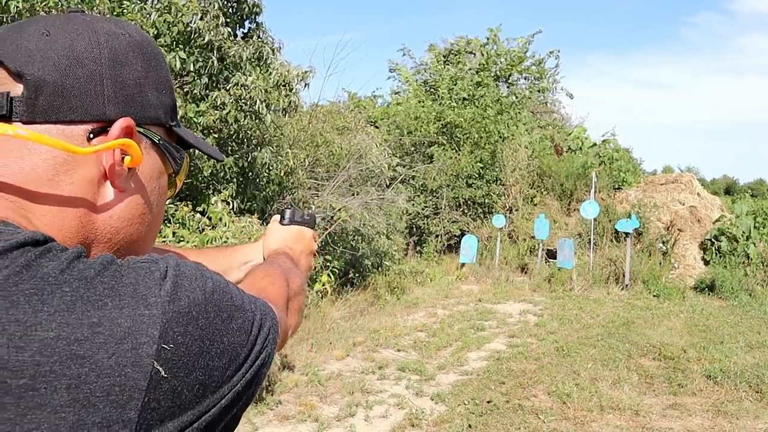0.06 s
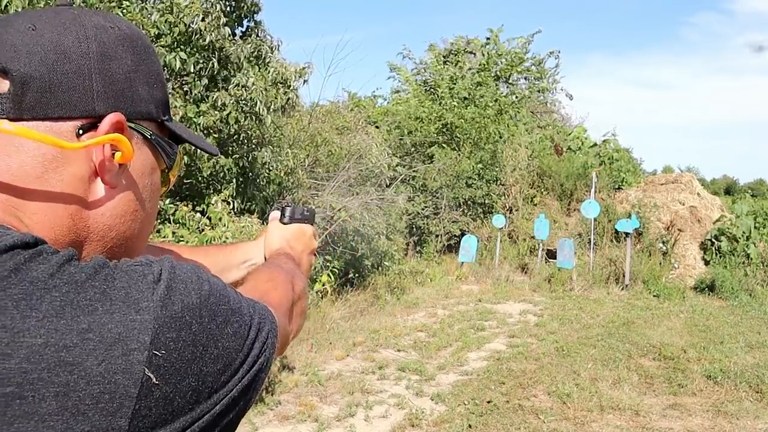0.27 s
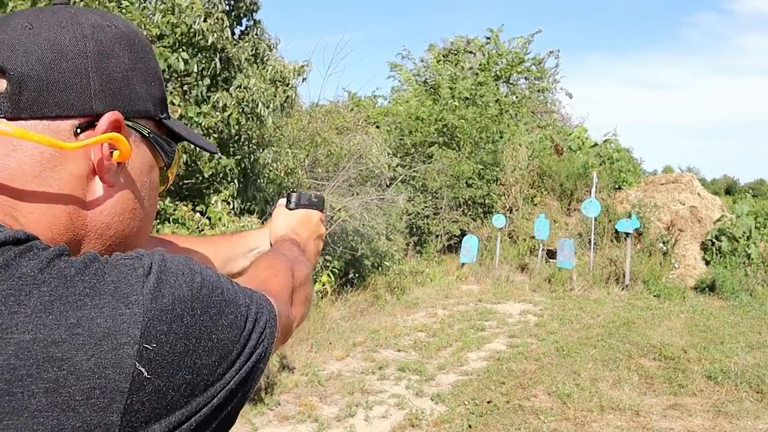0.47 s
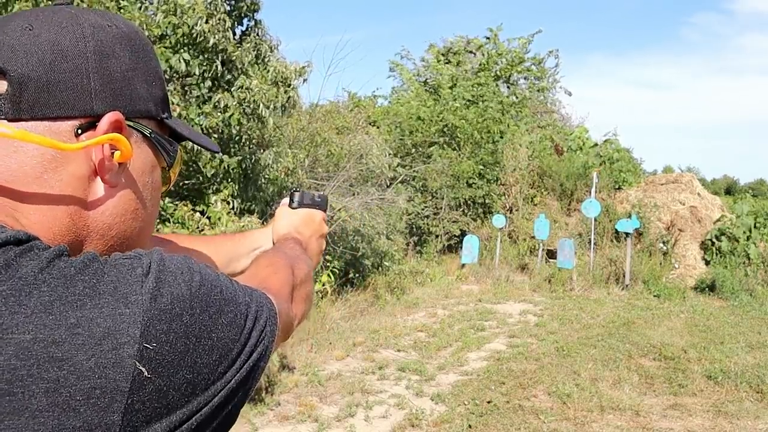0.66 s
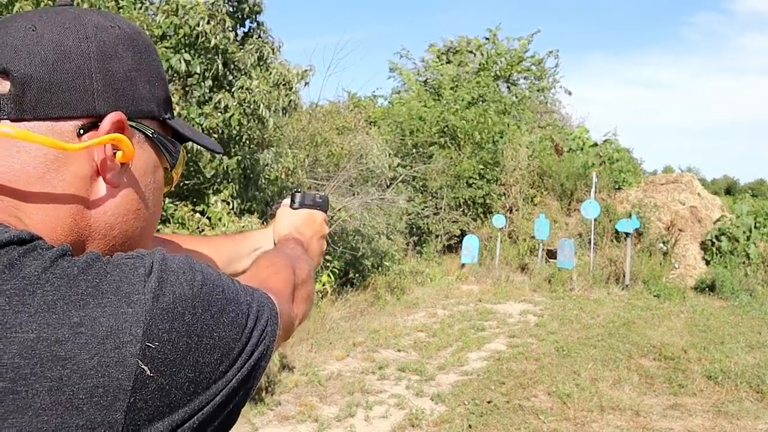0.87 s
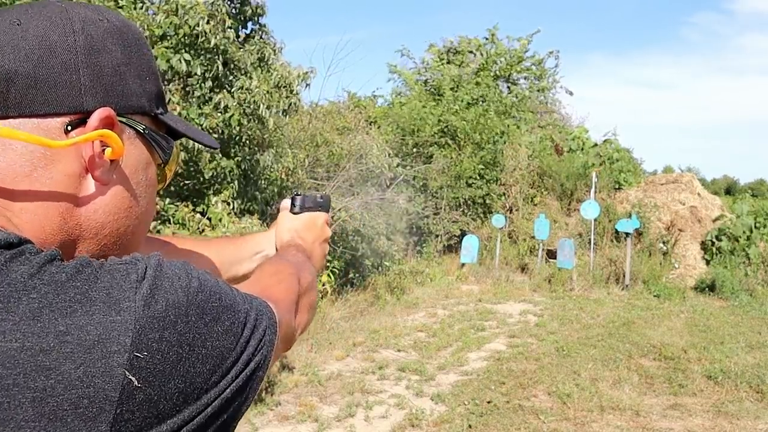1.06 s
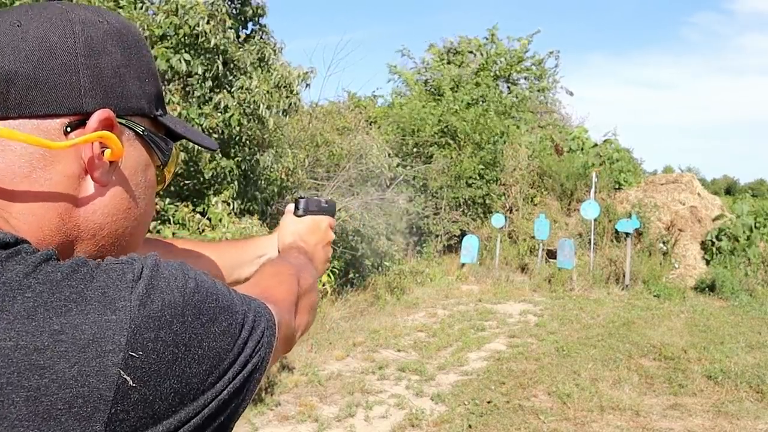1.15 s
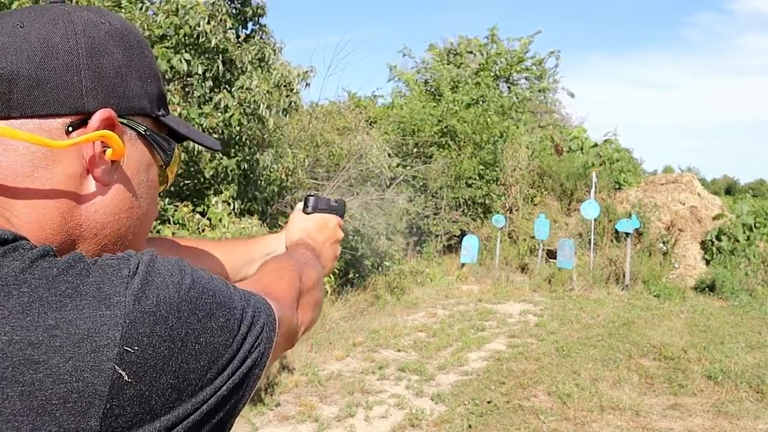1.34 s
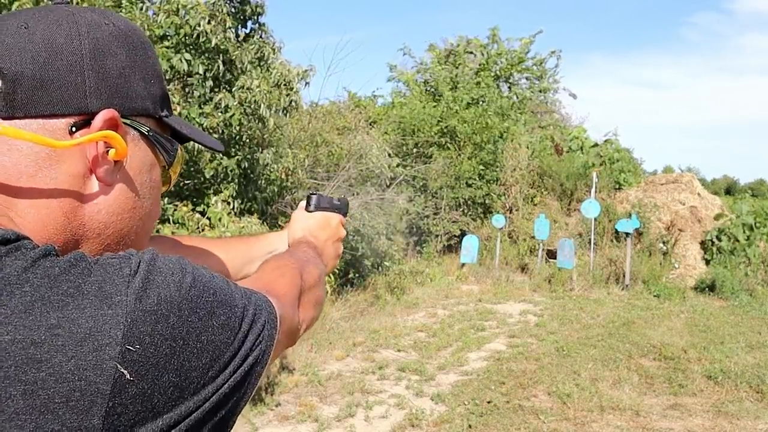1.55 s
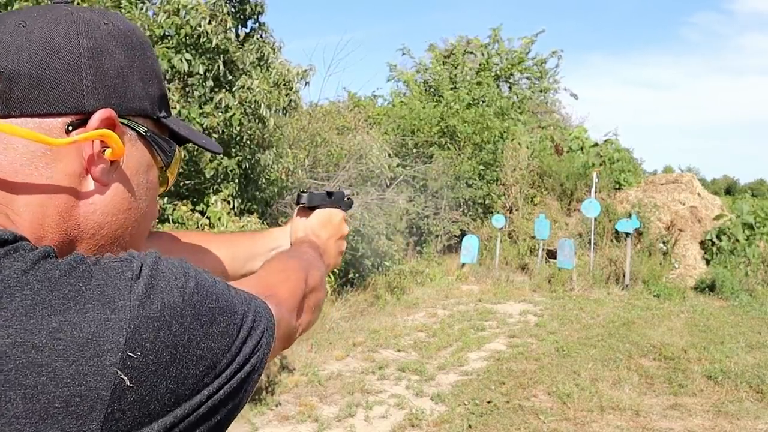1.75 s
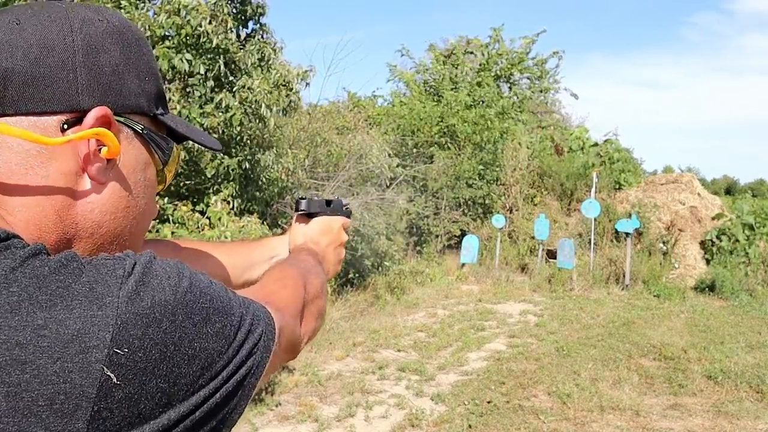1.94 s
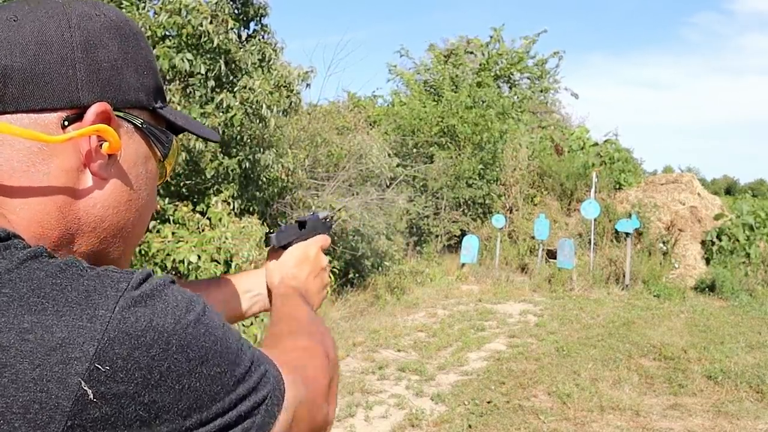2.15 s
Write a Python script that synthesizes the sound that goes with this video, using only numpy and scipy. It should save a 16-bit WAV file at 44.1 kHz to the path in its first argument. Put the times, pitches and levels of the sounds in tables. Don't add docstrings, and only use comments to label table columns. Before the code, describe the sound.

Over the fading ring of earlier shots and light wind, a handgun cracks three times close by; each bullet splashes on steel, and plates of different pitch shimmer and ring through scattered outdoor echoes.

```python
import sys
import numpy as np
from scipy import signal
from scipy.fft import rfft, irfft, next_fast_len
from scipy.io import wavfile
from scipy.ndimage import uniform_filter1d

SR = 44100
rng = np.random.default_rng(int(sys.argv[2]) if len(sys.argv) > 2 else 0)


def amplitude_ratio(level_db):
    exponent = np.asarray(level_db, float) / 20
    return 10 ** exponent


def dump(signal):
    limited = np.clip(np.atleast_2d(signal).T, -1, 1)
    pcm = np.round(limited * 32767).astype(np.int16)
    wavfile.write(sys.argv[1], SR, pcm)


N = 97020
T = np.arange(N) / SR
STEP = 32
COARSE = np.arange(0, N + STEP, STEP) / SR
RING_DELAY_S = .0467


def fade(t, t60_s):
    return (t >= 0) * np.exp(-np.log(1000) * np.maximum(t, 0) / t60_s)


def bell(t, center_s, width_s):
    return np.exp(-((t - center_s) / width_s) ** 2)


def band(low_hz, high_hz):
    edges_hz = [low_hz, min(high_hz, .45 * SR)]
    sos = signal.butter(3, edges_hz, "band", fs=SR, output="sos")
    x = signal.sosfilt(sos, rng.standard_normal(N))
    return x / x.std()


def walk(rate_hz):
    hold, n = int(SR / STEP / rate_hz), len(COARSE)
    steps = np.repeat(rng.standard_normal(n), hold)[:n]
    return 1.3 * uniform_filter1d(uniform_filter1d(steps, hold), hold)


def fine(envelope):
    return np.interp(T, COARSE, envelope)


def late(x, delay_s):
    k = int(delay_s * SR)
    return np.r_[np.zeros(k), x[:N - k]]


def wind():
    # time_s, level_db
    gusts = [(0, -58.5), (0.301, -62), (.74, -61), (0.893, -44.5), (1.1, -75), (1.97, -58.5), (2.2, -70)]
    time_s, level_db = np.array(gusts).T
    return fine(amplitude_ratio(np.interp(COARSE, time_s, level_db) + 1.2 * walk(36))) * band(20, 150)


def air():
    # pitch_hz, density_db (dB per Hz)
    spectrum = [(200, -19), (500, -10.5), (900, -5), (2000, -15.5), (5000, -23.5), (12000, -42.5)]
    pitch_hz, density_db = np.array(spectrum).T
    size = next_fast_len(N)
    bin_hz = np.arange(size // 2 + 1) * SR / size
    shape = amplitude_ratio(np.interp(np.log(bin_hz + 1), np.log(pitch_hz), density_db))
    noise = irfft(rfft(rng.standard_normal(size)) * shape, size)[:N]
    return amplitude_ratio(-60.5) * noise / noise.std()


def insects():
    pulses = np.cos(np.pi * 58 * T) ** 2
    return amplitude_ratio(-62.5) * (pulses * band(4250, 4900) + amplitude_ratio(-11) * band(7400, 8900))


def earlier_rings():
    # pitch_hz, level_db, t60_s
    rings = [(4454, -33.5, 0.42), (1180, -58, 1.7), (12530, -76.5, .9)]
    return sum(amplitude_ratio(db) * fade(T, t60_s) * np.sin(2 * np.pi * hz * T) for hz, db, t60_s in rings)


def scatter():
    # pitch_hz, near_db, near_t60_s, field_db, field_t60_s
    bands = [(60.6, -27.5, 0.16, -70, .5), (147, -29.5, 0.18, -64, 0.38), (388, -23.5, 0.2, -44.5, 0.79),
             (761, -12, 0.2, -39.5, 1.74), (1567, -20.5, 0.28, -31, 0.91), (3024, -13, 0.18, -24.5, 0.64),
             (6210, -13, 0.17, -29, .6), (9200, -21, 0.13, -32, 0.17), (14000, -23, 0.17, -38, .4)]
    near, far, t = 0, 0, COARSE
    rise = 1 - np.exp(-(t / .043) ** 2)
    for hz, near_db, near_t60_s, field_db, field_t60_s in bands:
        near_size = amplitude_ratio(near_db + 0.8 * walk(120)) * fade(t, near_t60_s)
        near = near + fine(near_size) * band(hz / 1.38, hz * 1.433)
        far_size = amplitude_ratio(field_db + 1.3 * walk(40)) * rise * fade(t, field_t60_s)
        far = far + fine(far_size) * band(hz / 1.45, hz * 1.3)
    return near, far


def bank_echoes():
    delays = (.113, .150, .163, .174, .186, .209, .222, .263, .290, .323, .367, .384, .400, .44, .555)
    levels = (-56, -18, -29.5, -27, -29, -27.5, -33.5, -41.5, -32, -37, -33, -40, -32.5, -42, -43)
    echo_hz, spread, slap_s = 785, 1.436, .0045
    slaps = fine(sum(amplitude_ratio(db) * bell(COARSE, s, slap_s) for s, db in zip(delays, levels)))
    tone = band(echo_hz / spread, echo_hz * spread)
    loudness = (uniform_filter1d(tone ** 2, size=300) + .1) ** .5
    return slaps * tone / loudness


def tree_line():
    t, top_hz = T - .372, 5400
    rise = np.clip(t / 0.0096, 0, 1)
    leaves = band(850, top_hz) + amplitude_ratio(-11.5) * band(top_hz, 8800)
    return amplitude_ratio(-37.5) * fade(t, 0.23) * rise * leaves


def partial(start_s, hz, size, swing):
    # pitch_hz, delay_s, width_s
    nulls = [(8228, .048, .011), (8228, .116, .005), (4487, .016, .006), (4487, .046, .006),
             (12530, .25, .012), (13810, .205, .015)]
    share, period_s, decay_s = swing
    k = int(start_s * SR)
    t, slow = T[k:] - start_s, np.maximum(COARSE - start_s, 0)
    gaps = np.prod([1 - .85 * bell(slow, s, w) for null_hz, s, w in nulls if null_hz == hz], axis=0)
    shimmer = amplitude_ratio(.5 * walk(25))
    size = np.interp(T[k:], COARSE, size * gaps * shimmer)
    size = size * (1 - np.exp(-t * hz / 9))
    bend = -share * np.cos(2 * np.pi * slow / period_s) * np.exp(-slow / decay_s) * (slow > 0)
    shift_s = np.cumsum(bend) * STEP / SR
    return np.r_[np.zeros(k), size * np.sin(2 * np.pi * hz * (t + np.interp(T[k:], COARSE, shift_s)))]


def chains(shot, start_s, swing):
    # pitch_hz, level_db, t60_s
    links = [
        [(8921, -45, 2.2), (8944, -43, 1.7)],
        [(12530, -54, 1.6)],
        [(13138, -40, .45)],
    ]
    t = np.maximum(COARSE - start_s, 0) + RING_DELAY_S
    return sum(partial(start_s, hz, amplitude_ratio(db) * fade(t, t60_s), swing) for hz, db, t60_s in links[shot])


def weak_partials(shot, start_s, swing):
    # pitch_hz, level_db, swell_delay_s
    big = [(1155, -39, .17), (1685, -46, .21), (3014, -42, .17), (3773, -40, .04), (4028, -43, .14),
           (4689, -37, .17), (5053, -44, .05), (5455, -35, .15), (5626, -40, .04), (6810, -40, .17),
           (8312, -42, .13), (9703, -46, .12), (10057, -51, .18), (10339, -51, .18), (11230, -43, .1),
           (11690, -55, .18), (11778, -48, .17), (12885, -49, .05), (13324, -52, .2), (13510, -52, .12),
           (14510, -58, .17), (15088, -51, .05)]
    # pitch_hz, level_db, swell_delay_s
    disc = [(6217, -42, .04), (7189, -43, .04), (8641, -50, .14), (9968, -46, .04), (12120, -53, .09),
            (12369, -50, .04), (13090, -54, .1), (13864, -62, .16), (14422, -56, .04), (14989, -64, .13),
            (15701, -55, .04)]
    # pitch_hz, level_db, swell_delay_s
    mid = [(1137, -33, .04), (4833, -43, .14), (6049, -45, .14), (7008, -44, .14), (7563, -37, .04),
           (8231, -37, .03), (9895, -46, .05), (10824, -42, .06), (11337, -44, .05), (11900, -62, .22),
           (14155, -58, .07), (14940, -47, .06), (15640, -51, .05)]
    # gain_db, swell_width_s, tail_share, tail_t60_s
    laws = [
        (0.1, 0.053, 0.56, 0.99),
        (0.1, 0.024, 0.069, 0.45),
        (0.1, 0.05, .2, .8),
    ]
    gain_db, width_s, tail, t60_s = laws[shot]
    t, out = np.maximum(COARSE - start_s, 0), 0
    for hz, db, delay_s in (big, disc, mid)[shot]:
        size = bell(t, delay_s, width_s) + tail * fade(t, t60_s * (5000 / hz) ** 0.15)
        out = out + partial(start_s, hz, amplitude_ratio(db + gain_db) * size, swing)
    return out


def later_lobes(shot, start_s, swing):
    # pitch_hz, level_db, delay_s, width_s
    lobes = [
        [(843, -33, .38, .05), (1685, -57, .4, .2), (4028, -60, .3, .08), (8944, -43, .16, .05)],
        [(4487, -44, .33, .08), (8228, -58, .25, .05), (8228, -26, .137, .011), (12530, -52, .08, .035),
         (12530, -60, .31, .05)],
        [(13810, -58, .235, .025), (6421, -38, .11, .025)],
    ]
    t = np.maximum(COARSE - start_s, 0)
    return sum(partial(start_s, hz, amplitude_ratio(db) * bell(t, s, w), swing) for hz, db, s, w in lobes[shot])


def strong_partials(shot, start_s, swing):
    # pitch_hz, strike_db, swell_db, swell_delay_s, ring_db
    big_face = [(843, -36.0, -27.0, 0.251, -11.0), (1786, -29.0, -24.0, 0.135, -51.0),
                (2050, -34.0, -40.0, 0.222, -41.0), (2277, -33.0, -48.0, 0.243, -20.0),
                (3280, -31.0, -42.0, 0.239, -34.0), (4343, -24.0, -30.0, 0.087, -48.0),
                (5181, -36.0, -28.0, 0.169, -35.0), (5347, -14.0, -21.0, 0.15, -37.0),
                (6315, -32.0, -47.0, 0.268, -26.0), (6488, -24.0, -27.0, 0.169, -44.0),
                (7002, -41.0, -39.0, 0.16, -26.0), (7366, -31.0, -41.0, 0.3, -22.0),
                (7552, -12.0, -26.0, 0.067, -47.0), (7863, -46.0, -25.0, 0.154, -28.0)]
    # pitch_hz, strike_db, swell_db, swell_delay_s, ring_db
    big_rim = [(1325, -34.0, -49.0, 0.216, -43.0), (2576, -49.0, -53.0, 0.192, -34.0),
               (8175, -50.0, -29.0, 0.167, -29.0), (8634, -22.0, -70.0, 0.04, -36.0),
               (8995, -16.0, -54.0, 0.156, -46.0), (10191, -38.0, -46.0, 0.191, -20.0),
               (10277, -22.0, -52.0, 0.04, -45.0), (10545, -30.0, -44.0, 0.192, -25.0),
               (12281, -27.0, -40.0, 0.132, -70.0), (13028, -32.0, -46.0, 0.171, -24.0),
               (13299, -23.0, -52.0, 0.088, -48.0), (13959, -40.0, -39.0, 0.199, -22.0),
               (14242, -60.0, -40.0, 0.209, -25.0), (14939, -60.0, -47.0, 0.197, -30.0)]
    # pitch_hz, strike_db, swell_db, swell_delay_s, ring_db
    small_disc = [(1997, -11.0, -27.0, 0.125, -42.0), (4487, -60.0, -43.0, 0.113, -15.0),
                  (7544, -50.0, -39.0, 0.123, -48.0), (8228, -23.0, -17.5, 0.026, -70.0),
                  (8228, -70.0, -21.0, 0.112, -40.0), (10205, -40.0, -42.0, 0.04, -70.0),
                  (11060, -60.0, -57.0, 0.132, -70.0), (12530, -45.0, -34.0, 0.148, -30.0)]
    # pitch_hz, strike_db, swell_db, swell_delay_s, ring_db
    mid_face = [(1207, -34.0, -54.0, 0.141, -30.0), (1904, -21.0, -25.0, 0.078, -49.0),
                (1955, -37.0, -52.0, 0.068, -33.0), (3058, -31.0, -40.0, 0.143, -29.0),
                (3301, -22.0, -37.0, 0.079, -50.0), (3663, -35.0, -35.0, 0.114, -23.0),
                (3855, -37.0, -40.0, 0.098, -38.0), (4921, -21.0, -21.0, 0.117, -27.0),
                (5425, -43.0, -44.0, 0.128, -41.0), (6421, -30.0, -28.0, 0.102, -49.0),
                (7283, -19.0, -40.0, 0.077, -48.0), (8641, -39.0, -51.0, 0.12, -43.0),
                (9028, -28.0, -45.0, 0.043, -70.0), (9082, -16.0, -55.0, 0.101, -70.0)]
    # pitch_hz, strike_db, swell_db, swell_delay_s, ring_db
    mid_rim = [(9557, -31.0, -49.0, 0.081, -47.0), (10441, -27.0, -51.0, 0.059, -70.0),
               (12821, -42.0, -45.0, 0.05, -70.0), (13143, -60.0, -36.0, 0.087, -43.0),
               (13810, -41.0, -70.0, 0.12, -23.0)]
    # strike_t60_s, swell_width_s, ring_t60_s at 1 kHz, t60_fall (exponent), gain_recovery_s
    laws = [
        (0.156, 0.08, 1.66, 0.257, 0.3),
        (0.143, 0.078, 2.301, 0.601, 0.3),
        (0.301, 0.031, 1.412, 0.305, 0.3),
        (0.142, 0.067, 1.978, 0.453, 0.3),
        (0.185, 0.064, 0.5, 0.095, 0.3),
    ]
    parts = list(zip([big_face, big_rim, small_disc, mid_face, mid_rim], laws))
    t, out = np.maximum(COARSE - start_s, 0), 0
    for modes, law in (parts[:2], parts[2:3], parts[3:])[shot]:
        strike_t60_s, width_s, ring_t60_s, fall, recovery_s = law
        for hz, strike_db, swell_db, delay_s, ring_db in modes:
            size = amplitude_ratio(strike_db) * fade(t, strike_t60_s)
            size = size + amplitude_ratio(swell_db) * bell(t, delay_s, width_s)
            ring = (1 - np.exp(-t / recovery_s)) * fade(t, ring_t60_s * (1000 / hz) ** fall)
            out = out + partial(start_s, hz, size + amplitude_ratio(ring_db) * ring, swing)
    return out


def plate(shot, start_s):
    # share, period_s, decay_s
    swings = [
        (.0004, .7, 1.),
        (.0028, .3, .35),
        (.0007, .32, .3),
    ]
    swing = swings[shot]
    out = strong_partials(shot, start_s, swing) + weak_partials(shot, start_s, swing)
    return out + later_lobes(shot, start_s, swing) + chains(shot, start_s, swing)


def splash(shot, start_s):
    levels = (-26, -23, -15)
    return amplitude_ratio(levels[shot]) * fade(T - start_s, 0.11) * band(5000, 11000)


def haze(shot, start_s):
    levels = (-35.5, -47, -42.5)
    swell = bell(T - start_s, .13, 0.069) * (T > start_s)
    return amplitude_ratio(levels[shot]) * swell * fine(amplitude_ratio(1.8 * walk(60))) * band(2800, 10500)


def low_bump(shot, start_s):
    # delay_s, level_db, width_s, top_hz
    puffs = [
        (.054, -32.5, .012, 173),
        (0.05, -35, 0.037, 62),
        (.05, -35, 0.0064, 310),
    ]
    delay_s, db, width_s, top_hz = puffs[shot]
    return amplitude_ratio(db) * bell(T - start_s, delay_s, width_s) * band(30, top_hz)


def blast(start_s):
    # delay_s, level_db, length_s
    bounces = [(.0059, -1, .0003), (.0067, -1.5, 0.0006), (.009, -5, 0.0004), (0.0105, -6, 0.0004),
               (.015, -11, .0004), (0.0318, -9, 0.0004), (0.0327, -9, .0004)]
    lead_s, crack_s, crack_hz = .01, 0.0021, 6200
    t = T[:4096] - lead_s
    gate = (t >= 0) * np.exp(-(np.maximum(t, 0) / crack_s) ** 4)
    out = amplitude_ratio(12.5) * gate * band(crack_hz / 5.11, crack_hz * 1.3)[:4096]
    out += amplitude_ratio(-34) * fade(t + .0035, 0.0063) * band(1500, 14000)[:4096]
    out += amplitude_ratio(-19) * fade(t, 0.035) * np.sin(2 * np.pi * 160 * t)
    for delay_s, db, length_s in bounces:
        u = (t - delay_s) / length_s
        shoulders = .35 * np.exp(-(u - 1.2) ** 2) + .25 * np.exp(-(u + 1.2) ** 2)
        out += amplitude_ratio(db) * (shoulders - 1.2 * np.exp(-(2 * u) ** 4))
    return late(np.r_[out, np.zeros(N)], start_s - lead_s)


def scene():
    starts = (.2089, .9966, 1.7419)
    # level_db, echo_db
    shots = [
        (.1, -5),
        (.1, -2.5),
        (.1, -0.45),
    ]
    near, far = scatter()
    far = far + bank_echoes() + tree_line()
    out = earlier_rings() + amplitude_ratio(13.5) * np.roll(far, -SR)
    for shot, (start_s, (db, echo_db)) in enumerate(zip(starts, shots)):
        hit_s = start_s + RING_DELAY_S
        out = out * amplitude_ratio(-29.5 * (T >= start_s))
        out = out + amplitude_ratio(db) * (blast(start_s) + late(near, start_s))
        out = out + amplitude_ratio(echo_db) * late(far, start_s) + low_bump(shot, start_s)
        out = out + plate(shot, hit_s) + splash(shot, hit_s) + haze(shot, hit_s)
    return (out + wind() + insects() + air())[None]


def roll_off(x):
    return signal.sosfilt(signal.butter(12, 15970, fs=SR, output="sos"), x)


def record(dry):
    ceiling = 0.95
    flat = dry / (1 + np.abs(dry / ceiling) ** 4) ** 0.32
    return roll_off(flat)


dry = scene()
out = record(dry)
dump(out)
```